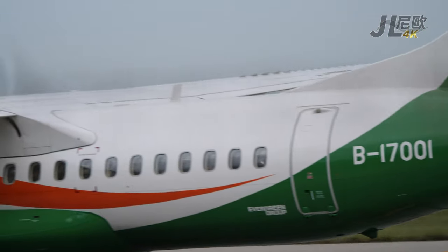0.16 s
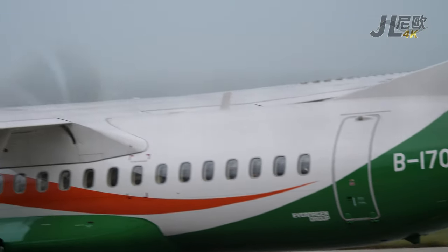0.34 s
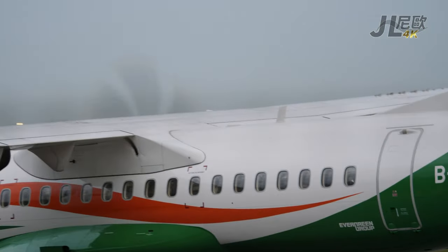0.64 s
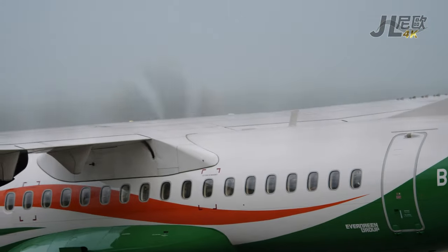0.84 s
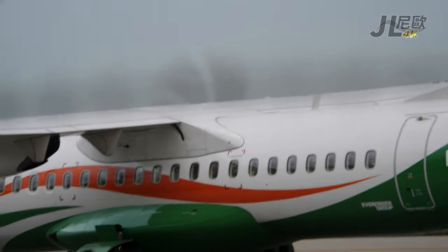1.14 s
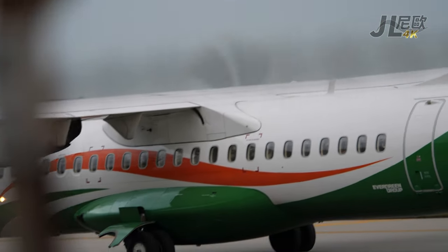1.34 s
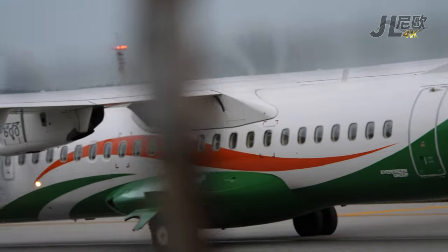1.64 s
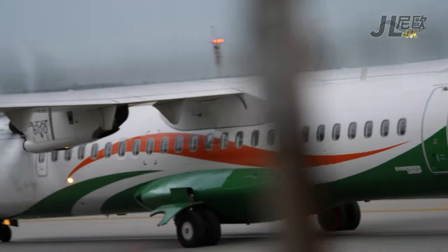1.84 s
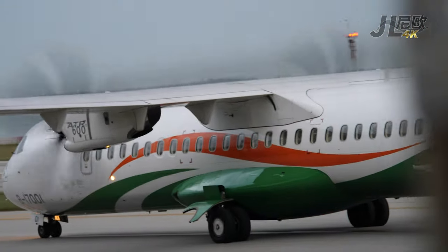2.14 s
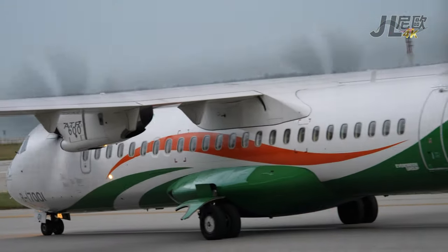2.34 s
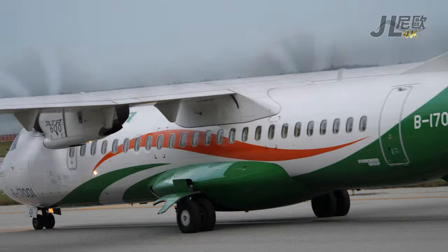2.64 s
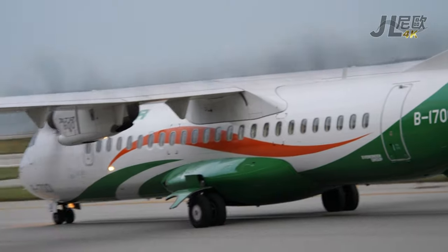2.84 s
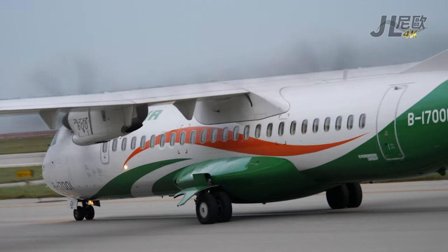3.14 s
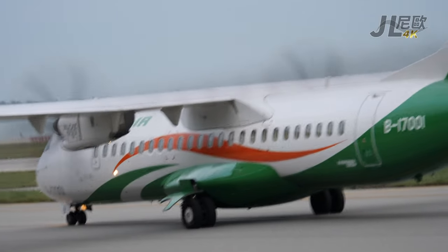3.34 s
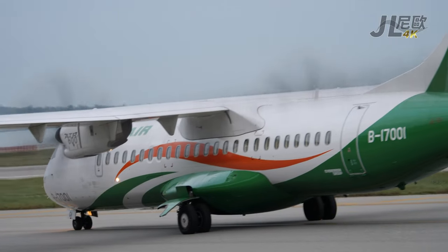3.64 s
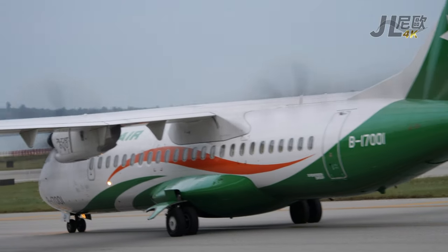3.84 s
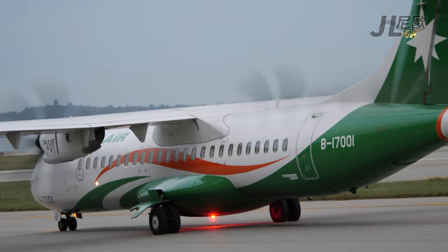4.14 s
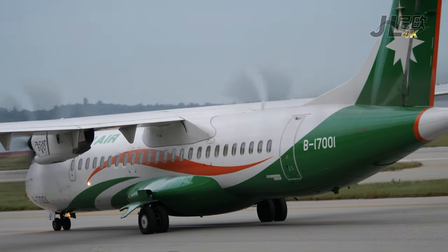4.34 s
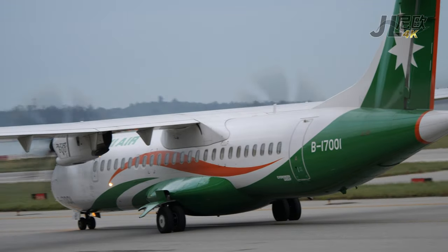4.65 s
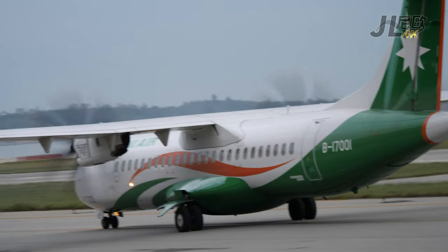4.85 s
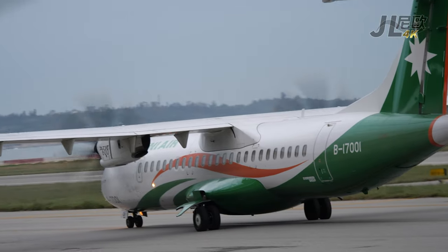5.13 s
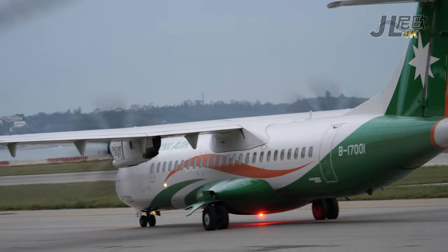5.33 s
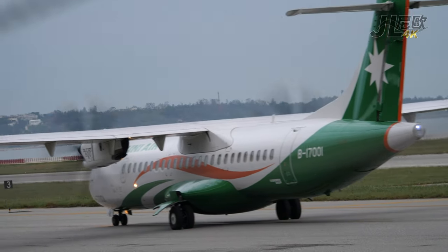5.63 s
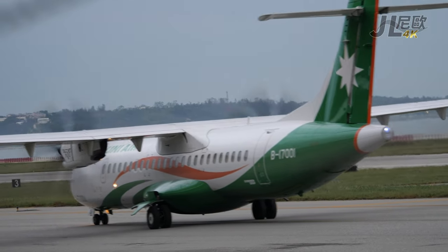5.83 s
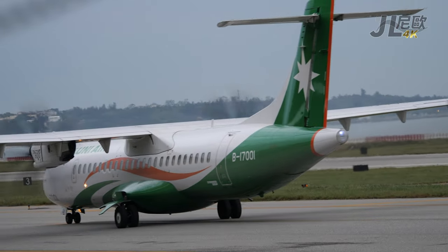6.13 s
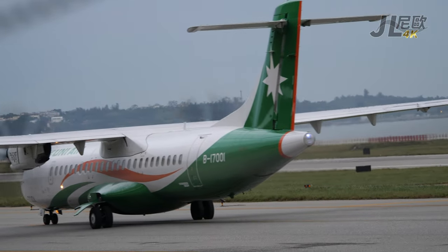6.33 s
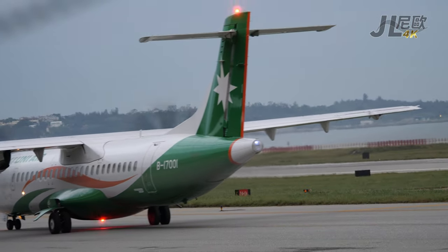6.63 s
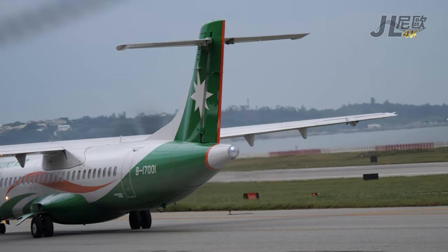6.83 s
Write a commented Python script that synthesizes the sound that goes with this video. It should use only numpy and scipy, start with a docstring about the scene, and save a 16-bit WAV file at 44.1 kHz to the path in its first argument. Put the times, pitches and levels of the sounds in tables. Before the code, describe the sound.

A twin turboprop airliner taxis past close by, its engine roar and hiss carrying a low propeller drone and thin high whines.

```python
"""Beside a taxiway, a camera's stereo microphone hears a twin turboprop pass and turn away.
It opens on rumble, a low drone and thin compressor whines, over exhaust roar and hiss chopped by the blades.
The tones sag as it passes, and spells of falling treble chirps build, twice a propeller turn. After four
seconds the near whine fades and a far whistle comes and goes. All along, two weaker paths comb the roar,
and the camera body cuts dips that end higher as the aircraft's bearing changes."""
import sys
import numpy as np
from scipy import signal
from scipy.fft import rfft, irfft, next_fast_len
from scipy.io import wavfile
from scipy.ndimage import uniform_filter1d, map_coordinates

SR = 44100
rng = np.random.default_rng(int(sys.argv[2]) if len(sys.argv) > 2 else 0)


def dump(signal):
    """Clip the signal to [-1, 1] and save it as 16-bit WAV at the path in sys.argv[1]."""
    limited = np.clip(np.atleast_2d(signal).T, -1, 1)
    pcm = np.round(limited * 32767).astype(np.int16)
    wavfile.write(sys.argv[1], SR, pcm)


N = 307938
FRAME = 512
GRID_HZ = np.fft.rfftfreq(FRAME, 1 / SR)[:, None]
GRID_S = np.arange(-(-N // (FRAME // 2)) + 1) * (FRAME // 2) / SR

# Each row: time in seconds, propeller turns a second.
SHAFT_SPEED = [(0, 13.735), (4, 13.735), (5, 13.66), (6.98, 13.64)]
# Each row: time in seconds, pitch factor of the pass.
DOPPLER = [(0, 1.0175), (1.5, 1.009), (2.9, 1.0005), (3.6, .999), (6.98, .998)]
# Each row: time in seconds, level in dB.
FIZZ_LEVEL = [(0, -42), (.3, -37), (.6, -41.5), (2, -42.5), (2.8, -43), (3.5, -41), (4.2, -43), (5, -44),
              (6.98, -48)]
HOARSE_LEVEL = [(0, -38), (.4, -34), (.75, -44), (1.1, -35), (1.5, -32), (1.7, -44), (2.05, -35),
                (2.35, -46), (3, -60), (6.98, -60)]
DRONE_LEVEL = [(0, -25), (.16, -32), (.24, -26), (.66, -23.5), (.8, -28.5), (1.25, -26), (1.58, -30),
               (1.75, -24), (2.03, -26.5), (2.17, -41), (2.34, -25), (2.45, -36.5), (3.07, -30),
               (3.17, -43), (3.3, -34), (4.05, -32), (4.33, -51), (4.55, -35), (4.85, -32.5), (5.25, -46.5),
               (5.42, -32.5), (5.58, -42), (6, -32.5), (6.24, -30), (6.32, -47), (6.47, -29.5),
               (6.64, -40.5), (6.8, -27), (6.98, -30)]
# Each row: time in seconds, then near whine, buzz and far whistle in dB.
WHINE_LEVELS = [(0, -31.5, -36, -60), (.35, -32, -38, -60), (.55, -38, -38, -60), (.85, -33.5, -40, -60),
                (1.2, -39, -40, -60), (2, -38, -39, -60), (2.4, -35, -41, -60), (2.9, -34.5, -44, -60),
                (3.15, -29, -48, -60), (3.52, -29, -52, -60), (3.65, -39, -55, -60), (3.95, -38, -60, -60),
                (4.08, -30.5, -60, -60), (4.25, -44, -60, -60), (4.75, -46, -60, -47),
                (4.92, -46, -60, -35), (5.1, -48, -60, -46), (5.27, -48, -60, -30), (5.4, -48, -60, -42),
                (5.49, -48, -60, -27), (5.7, -48, -60, -36), (5.92, -48, -60, -48), (6.1, -48, -60, -32),
                (6.24, -48, -60, -28.5), (6.36, -48, -60, -44), (6.5, -48, -60, -29), (6.63, -48, -60, -31),
                (6.73, -48, -60, -44), (6.82, -48, -60, -33), (6.98, -48, -60, -37)]
# Each row: time in seconds, then rumble, exhaust, roar and hiss in dB.
ENGINE_LEVELS = [(0, -23.5, -26, -21.5, -21), (.55, -27.5, -27, -23, -23), (.9, -26.5, -25.5, -20, -22),
                 (1.3, -26.5, -24, -21.5, -22.5), (1.7, -28, -23.5, -20.5, -22.5),
                 (2.2, -28, -24, -20, -23), (3.1, -28, -22, -17.5, -21.5), (3.7, -31, -21.5, -20, -22.5),
                 (4.4, -30.5, -21, -18, -19.5), (4.9, -35.5, -23, -20, -21.5),
                 (5.4, -33, -23, -21.5, -20.5), (6.3, -34, -22.5, -22, -21.5), (6.98, -31, -22, -22, -20)]
# Source spectra. Each row: frequency in Hz, relative level in dB.
FIZZ_COLOUR = [(10500, -30), (11500, -9), (12500, -2), (13500, -1), (14300, -3), (14900, -7), (15300, -22),
               (15700, -36)]
CHIRP_COLOUR = [(7000, 9), (11500, -4), (13500, 0), (15000, -11)]
RUMBLE_COLOUR = [(20, -56), (55, -42), (75, -22), (100, -9), (125, -3), (190, 8), (270, 0), (330, -1),
                 (450, -2), (900, -31.5)]
EXHAUST_COLOUR = [(200, -25.5), (400, -13.5), (550, -3), (700, -3.5), (850, -1.5), (980, -2), (1100, -5),
                  (1400, -63), (2500, -55)]
ROAR_COLOUR = [(700, -78), (1100, -3.5), (1400, -1.5), (2000, -3), (2500, -1.5), (3300, -3.5), (4500, -64)]
HISS_COLOUR = [(2200, -23.5), (3100, 3.5), (3600, 3), (4700, 0.5), (6000, -7.5), (8000, -9.5), (9500, -6.5),
               (11000, -18), (12200, -16), (13500, -48), (15000, -90)]
# Each row: start and length in half turns, first and last pitch in Hz, drift in half turns a second.
CHIRPS = [(.77, .27, 14300, 12500, .012), (1.02, .32, 12400, 10200, .035), (.82, .22, 10300, 8800, 0)]
# Each row: time in seconds, pitch added to the chirps in Hz.
CHIRP_LIFT = [(0, 0), (3.4, 0), (3.85, 450), (4.2, 400), (4.5, 0)]
# Each row: start and length in seconds, level of each of the three chirps in dB.
CHATTER_SPELLS = [(1.45, .95, -49, -56, -55), (2.55, .3, -45, -52, -46), (2.97, .45, -39.5, -45, -49),
                  (3.42, .36, -43.5, -48, -48), (3.8, .43, -39, -50, -46), (4.4, 1, -44.5, -50, -56),
                  (5.46, .9, -48, -43, -42), (6.36, .44, -52, -39.5, -40), (6.8, .4, -54, -35.5, -34.5)]

# The way to the microphone. Each row: time in seconds, first flank notch in Hz, flank and tail path gains,
# slide and depth factors of the body dips, cavity notch depth in dB.
PATHS = [(0, 556, 0.18, 0.21, 0.99, 0.69, 15), (.9, 706, 0.22, 0.042, 0.95, 1.04, 2.5),
         (2, 918, 0.27, 0, 0.98, 0.94, 0.5), (2.8, 1090, 0.25, 0.25, 0.93, 1.06, -2),
         (3.6, 980, 0.19, 0.25, 0.92, 1.01, 3), (4.5, 1124, 0.52, 0.55, 0.96, 1.15, 5),
         (5.6, 1190, 0.57, 0.55, 0.99, 0.98, 4), (6.98, 1350, 0.24, 0.44, 1.074, 1.03, 13)]
# Peaks and hollows. Each row: time in seconds, ridge in Hz, its height in dB, flank notch core in dB,
# upper notch in Hz, its depth in dB, tail hollow in dB, cavity notch in Hz, low dip in dB.
CONTOUR = [(0, 1520, 4.5, 6, 1740, -0.5, -1.5, 1150, 2), (.8, 1560, 4.5, 8, 1860, 2, 2, 1160, 1),
           (1.3, 1530, 5, 10, 2130, 1, -0.5, 1110, 1.5), (2.1, 1790, 3, 5, 2440, 2.5, 1.5, 1140, 6.5),
           (3, 2050, 0, 4, 2590, 3, -0.5, 1160, 6.5), (3.6, 2300, 3, -1.5, 2600, -3, -2, 1140, 4.5),
           (4.4, 2160, -1, 1, 2600, -2.5, -2.5, 1200, 2.5), (5.2, 1860, 3.5, -2, 2600, -2.5, -1.5, 1210, 3),
           (6, 1860, 7.5, 3, 2600, -0.5, 1, 1210, 2), (6.98, 1950, 5, 1, 2600, 1, 1, 1220, 6.5)]
# Each row: time in seconds, exhaust resonance in Hz, its height in dB.
EXHAUST_RING = [(0, 830, 4), (.8, 890, 0.5), (3.5, 900, -2.5), (4.6, 935, 3), (5.5, 950, 3.5),
                (6.2, 940, 4), (6.98, 940, 3.5)]
# Camera body and microphone ports. Each row: centre and width in Hz, depth in dB.
BODY_DIPS = [(3072, 630, 13), (2885, 280, 3.5)]
BODY_TREBLE_DIPS = [(7080, 550, 7.5), (11750, 520, 10)]
PORT_DIPS = [(3270, 120, 5), (3620, 130, -4), (4050, 150, 1), (4570, 80, 2.5)]
# Each row: time in seconds, slide and depth factors of the treble dips.
TREBLE_SLIDE = [(0, .995, 1), (3.6, 1, 1), (5, 1.025, .9), (6.98, 1.06, .9)]
# Left minus right, and its scattered part relative to that. Each row: frequency in Hz, gain in dB.
SIDE_GAIN = [(25, -7.5), (60, -31), (150, -78), (300, -39), (600, -20), (1000, -4.5), (1200, -4.5),
             (2000, -5.5), (2800, -21), (3600, -15.5), (4200, -32), (6000, -16), (7800, -21.5), (9000, -51),
             (10500, -21.5), (12000, -10.5), (13500, -8), (15000, -10)]
SCATTER_GAIN = [(300, 6), (450, -2), (650, -7), (1000, -8), (1250, -4), (1600, -3), (1900, -5), (2500, -1),
                (3000, -2), (3600, -4), (4500, 7), (5600, 1), (7500, 1), (10500, 7), (13000, -1),
                (15000, 6)]
# Each row: frequency in Hz, side phase against the mid in radians.
SIDE_PHASE = [(300, 1), (450, .1), (650, -.7), (850, -.8), (1050, -.4), (1200, .9), (1350, 1.5), (1600, .7),
              (1900, -.6), (2150, -1.3), (2400, -1.1), (2800, -.2), (3400, .2), (5600, -.4), (6500, -.8),
              (7500, .3), (10500, .7), (12500, 2.5), (15000, .9)]
# Each row: time in seconds, coherent side gain, side dip in dB, phase turn in radians.
BEARING = [(0, 0.71, 7, -2), (.75, 0.66, 7, -2), (2, 0.59, 6.5, -0.7), (3.2, 0.54, 1.5, -.1),
           (4.2, 0.46, -1, 0), (6.98, 0.54, -1, 2.5)]
# Each row: frequency in Hz, share of that phase turn.
TURN_SHARE = [(1050, 0), (1300, 1), (2400, 1), (2800, 0)]
# Wind filter. Each row: frequency in Hz, gain in dB.
LOW_CUT = [(20, -22), (50, -23), (80, -7.5), (105, -0.5)]


def amp(db):
    """dB to gain."""
    return 10 ** (np.asarray(db) / 20)


def unit(x):
    """x at rms 1."""
    return x / np.sqrt(np.mean(x ** 2) + 1e-20)


def along(points, hz):
    """Interpolates (Hz, value) points on a log axis."""
    f, v = np.transpose(points)
    return np.interp(np.log(hz + 1), np.log(f + 1), v)


def curves(rows, t=None):
    """One value per moment for each column after the time."""
    s, *cols = np.transpose(rows)
    return [np.interp(np.arange(N) / SR if t is None else t, s, c) for c in cols]


def wobble(rate):
    """A smooth random curve, rate knots a second."""
    return map_coordinates(rng.standard_normal(int(N * rate / SR) + 4), [np.arange(N) * rate / SR])


def dips(table, hz):
    """Gain of bell-shaped dips; a negative depth makes a peak."""
    return amp(-sum(db * np.exp(-((hz - centre) / width) ** 2) for centre, width, db in table))


def shaft_angle():
    """Angle of the propeller in radians."""
    return 2 * np.pi * np.cumsum(curves(SHAFT_SPEED)[0]) / SR


def tone(hz, db, waver_hz, flutter_db):
    """A sine that wavers in pitch and flutters in level through moving air."""
    phase = 2 * np.pi * np.cumsum(hz + waver_hz * wobble(25)) / SR
    return np.sqrt(2) * amp(db) * unit(amp(flutter_db * wobble(14))) * np.sin(phase)


def mid_gain():
    """Two paths up to a millisecond shorter than the main one comb the sound; the camera cuts dips."""
    hz = GRID_HZ
    notch_hz, flank, tail, slide, depth, cavity_db = curves(PATHS, GRID_S)
    ridge_hz, ridge_db, core_db, upper_hz, upper_db, tail_db, cavity_hz, low_db = curves(CONTOUR, GRID_S)
    treble_slide, treble_depth = curves(TREBLE_SLIDE, GRID_S)
    ring_hz, ring_db = curves(EXHAUST_RING, GRID_S)
    tail_spacing_hz = 1037 + 38.6 * GRID_S
    blur = np.exp(-(hz / 4200) ** 2)  # moving air scrambles the treble of the weaker paths
    by_flank = flank * blur * np.exp(1j * np.pi * hz / notch_hz)
    by_tail = tail * blur * np.exp(1j * (2 * np.pi * hz / tail_spacing_hz + .82))
    contour = dips([(ridge_hz, 160, -ridge_db), (notch_hz, 90, core_db), (upper_hz, 150, upper_db),
                    (1640, 120, tail_db), (355, 80, low_db), (ring_hz, 110, -ring_db)], hz)
    body = dips(BODY_DIPS, hz / slide) ** depth * dips(BODY_TREBLE_DIPS, hz / treble_slide) ** treble_depth
    ports = dips(PORT_DIPS + [(cavity_hz, 95, cavity_db)], hz)
    return contour * (1 + by_flank) * (1 + by_tail) * body * ports


def microphone():
    """Mid, coherent side and scattered side gains as the aircraft's bearing changes."""
    hz, mid = GRID_HZ, mid_gain()
    lean, dip_db, turn = curves(BEARING, GRID_S)
    side = amp(along(SIDE_GAIN, hz)) * dips([(1260, 560, dip_db), (533, 220, -dip_db)], hz)
    phase = np.angle(mid) + along(SIDE_PHASE, hz) + turn * along(TURN_SHARE, hz)
    return mid, lean * side * np.exp(1j * phase), amp(along(SCATTER_GAIN, hz)) * side


def arrive(x, colour, mic, patchy_db):
    """Colours a source and carries it to both ports, the mid at the level it came with."""
    z = signal.stft(x, SR, nperseg=FRAME)[2]
    eddies = uniform_filter1d(rng.standard_normal(z.shape), size=5, axis=0)
    eddies = unit(uniform_filter1d(eddies, size=12, axis=1))
    z = z * amp(along(colour, GRID_HZ) + patchy_db * eddies)  # the exhaust wash makes patches
    to_mid, coherent, scattered = mic
    side = z * coherent + np.roll(z, 3, axis=1) * scattered  # scattered sound comes three hops later
    mid, side = signal.istft(np.array([z * to_mid, side]), SR, nperseg=FRAME)[1][:, :N]
    return np.array([mid + side, mid - side]) * np.sqrt(np.mean(x ** 2) / np.mean(mid ** 2))


def fizz(mic):
    """Faint, steady noise in the top treble."""
    return amp(curves(FIZZ_LEVEL)[0]) * arrive(rng.standard_normal(N), FIZZ_COLOUR, mic, patchy_db=0)


def chirp(start, length, from_hz, to_hz, drift):
    """A hoarse whistle that falls as a blade swings away, twice a turn."""
    onset = start + drift * (np.arange(N) / SR - 3.2)
    progress = np.minimum((shaft_angle() / np.pi - onset) % 1 / length, 1)
    hz = from_hz + curves(CHIRP_LIFT)[0] + (to_hz - from_hz) * progress
    phase = 2 * np.pi * np.cumsum(hz) / SR
    whistle = wobble(2000) * np.cos(phase) + wobble(2000) * np.sin(phase)
    flicker = amp(.89 * wobble(300) + wobble(27))
    return unit(np.sin(np.pi * progress) * flicker * whistle)


def blade_chatter(mic):
    """Chirps off the blades, in spells that fade in, hold and fade out."""
    t = np.arange(N) / SR
    fade_s, lull_db = .15, -58
    gains = np.full((len(CHIRPS), N), amp(lull_db))
    for start, length, *db in CHATTER_SPELLS:
        inside_s = np.minimum(t - start, start + length - t)
        gains += amp(db)[:, None] * np.clip(inside_s / fade_s + .5, 0, 1)
    chirps = sum(gain * chirp(*row) for gain, row in zip(gains, CHIRPS))
    return arrive(chirps, CHIRP_COLOUR, mic, patchy_db=-.5)


def compressor_whines():
    """Thin tones, dead centre; blades chop the buzz, and the far whistle comes at a settled pitch."""
    doppler, = curves(DOPPLER)
    near_db, buzz_db, far_db = curves(WHINE_LEVELS)
    near = tone(4256 * doppler, near_db, waver_hz=3, flutter_db=1.2)
    buzz = tone(4655 * doppler, buzz_db, waver_hz=2.5, flutter_db=2.5)
    chop = 1 + 1.5 * np.cos(6 * shaft_angle())
    hoarse = tone(3560 * doppler, curves(HOARSE_LEVEL)[0], waver_hz=35, flutter_db=4)
    far = tone(4718, far_db, waver_hz=11, flutter_db=1.2)
    return near + buzz * chop + hoarse + far


def drone():
    """The low engine tone, dead centre, sagging in pitch as it passes."""
    return tone(125.3 * curves(DOPPLER)[0], curves(DRONE_LEVEL)[0], waver_hz=.7, flutter_db=.9)


def engine_flow(mic):
    """Four bands of turbulent flow that share a gust; six blades chop the upper three."""
    rumble_db, exhaust_db, roar_db, hiss_db = curves(ENGINE_LEVELS)
    blades, gust = np.cos(6 * shaft_angle()), wobble(9)

    def band(db, colour, chop, gust_db, patchy_db):
        flow = rng.standard_normal(N) * (1 + chop * blades) * amp(gust_db * (gust + wobble(22)))
        return amp(db) * arrive(flow, colour, mic, patchy_db)

    return (band(rumble_db, RUMBLE_COLOUR, chop=0, gust_db=.68, patchy_db=.8)
            + band(exhaust_db, EXHAUST_COLOUR, chop=.07, gust_db=.74, patchy_db=.5)
            + band(roar_db, ROAR_COLOUR, chop=.05, gust_db=.047, patchy_db=1.03)
            + band(hiss_db, HISS_COLOUR, chop=.085, gust_db=.32, patchy_db=.97))


def scene():
    """The aircraft as heard from beside the taxiway, left and right."""
    mic = microphone()
    return engine_flow(mic) + blade_chatter(mic) + fizz(mic) + drone() + compressor_whines()


def record(dry):
    """The camera cuts wind rumble and keeps nothing above its band limit."""
    size, top_hz = next_fast_len(N), 15720
    hz = np.fft.rfftfreq(size, 1 / SR)
    return irfft(rfft(dry, size) * amp(along(LOW_CUT, hz)) * (hz < top_hz), size)[:, :N]


dry = scene()
out = record(dry)
dump(out)
```